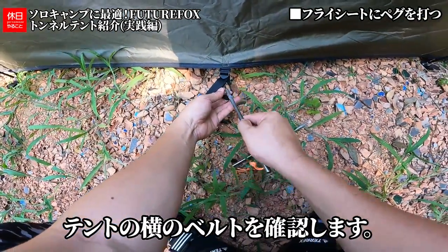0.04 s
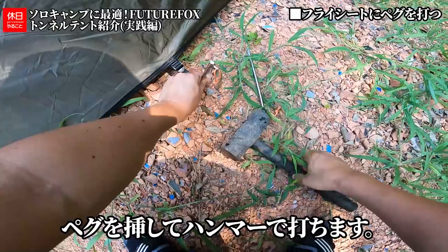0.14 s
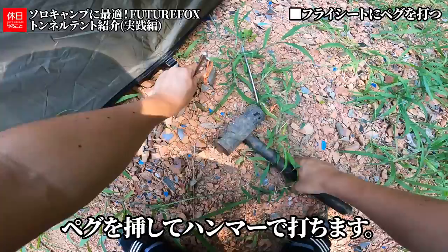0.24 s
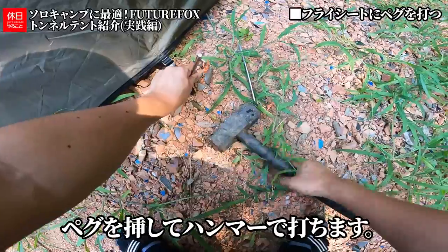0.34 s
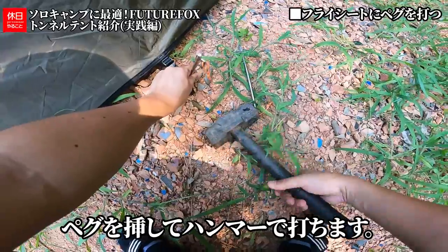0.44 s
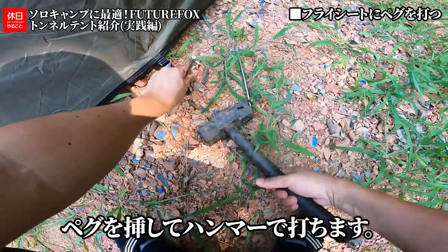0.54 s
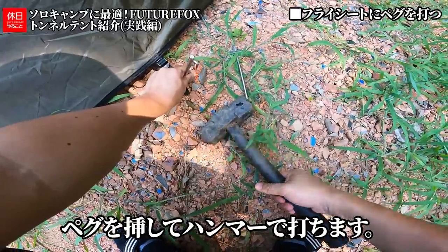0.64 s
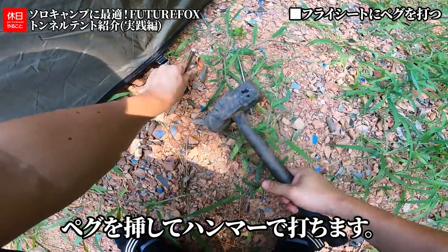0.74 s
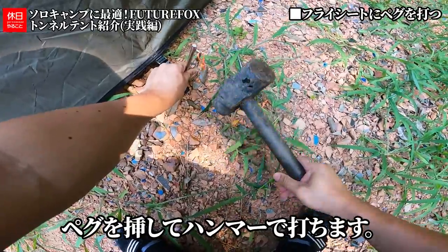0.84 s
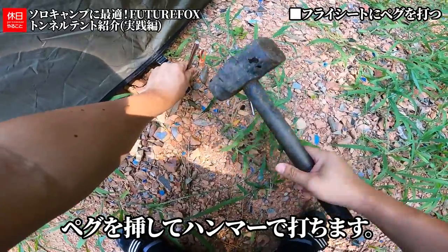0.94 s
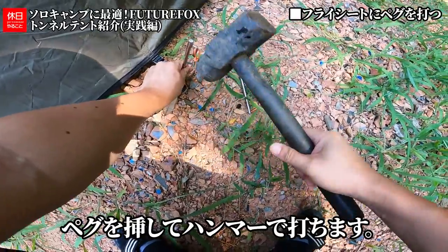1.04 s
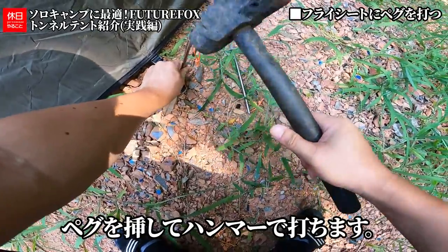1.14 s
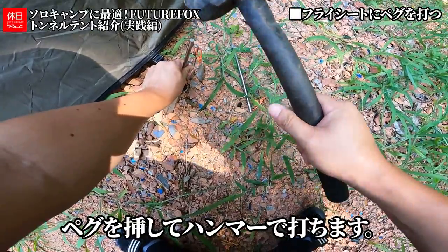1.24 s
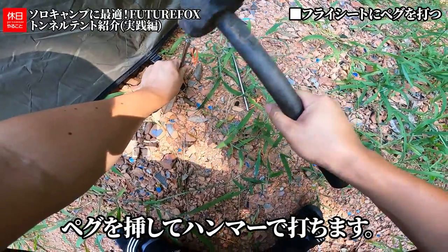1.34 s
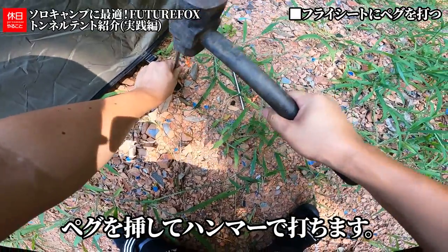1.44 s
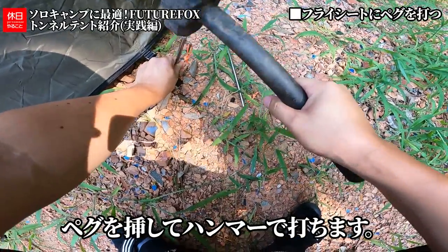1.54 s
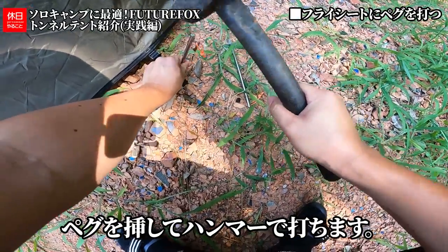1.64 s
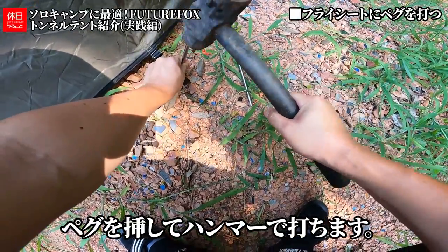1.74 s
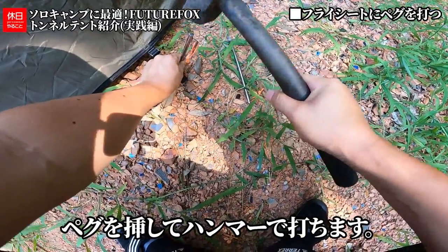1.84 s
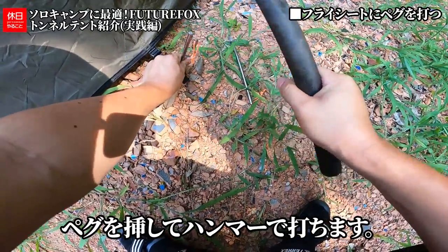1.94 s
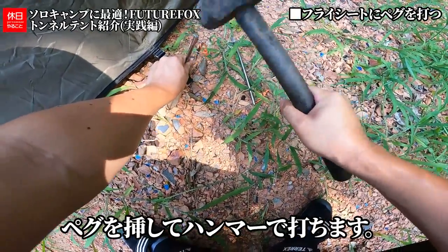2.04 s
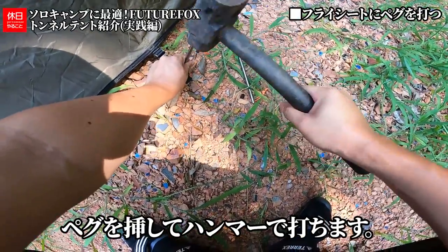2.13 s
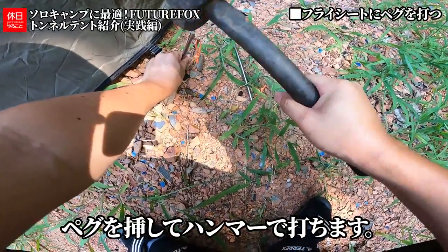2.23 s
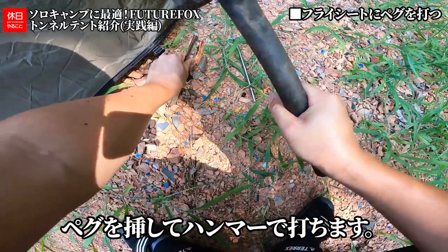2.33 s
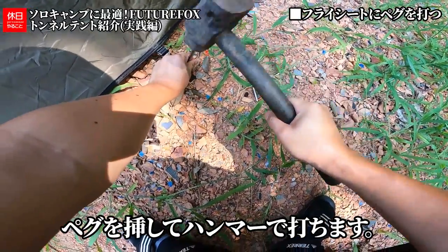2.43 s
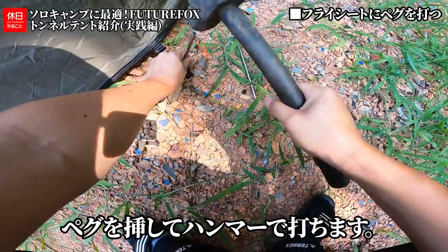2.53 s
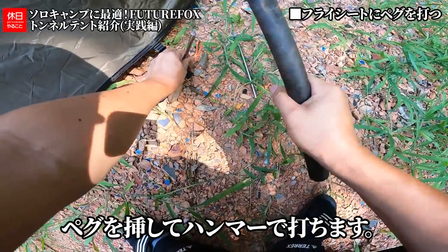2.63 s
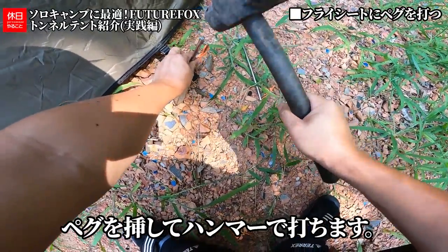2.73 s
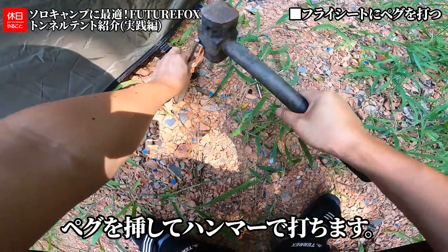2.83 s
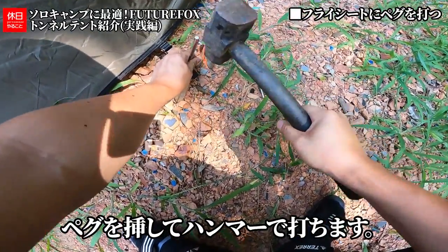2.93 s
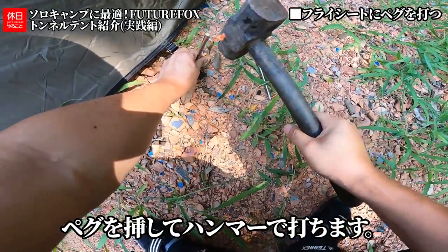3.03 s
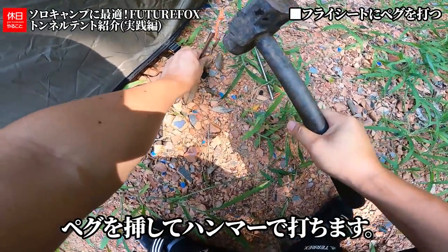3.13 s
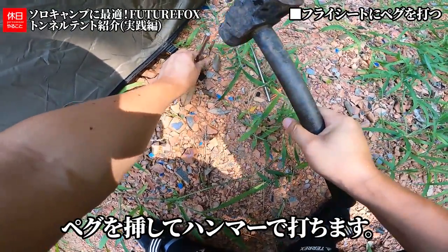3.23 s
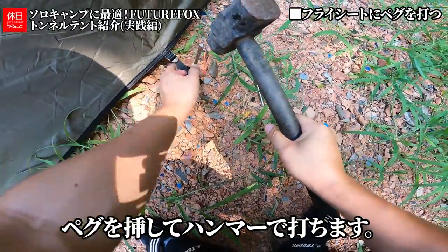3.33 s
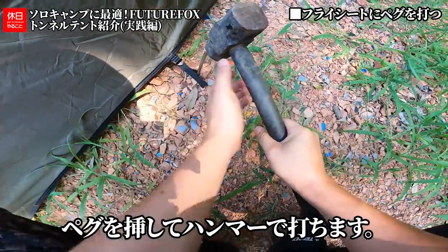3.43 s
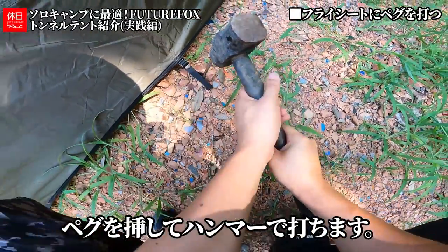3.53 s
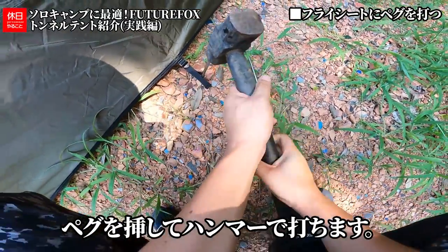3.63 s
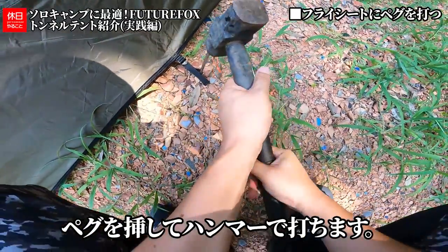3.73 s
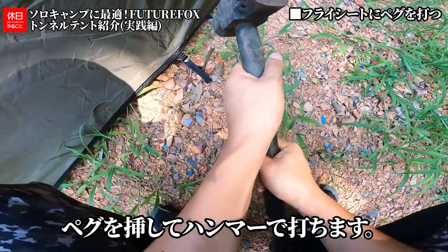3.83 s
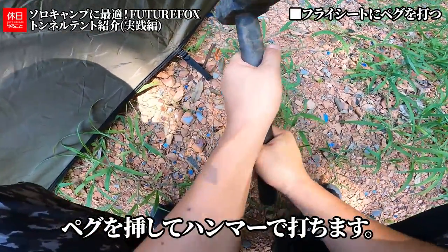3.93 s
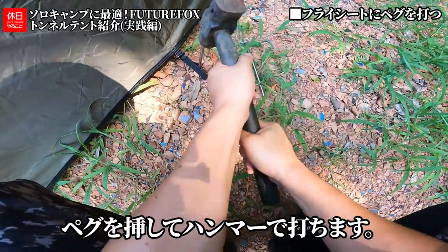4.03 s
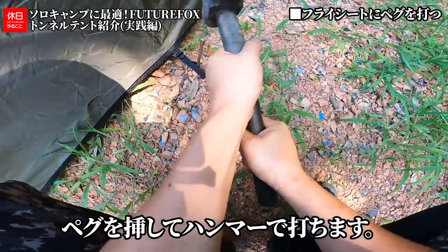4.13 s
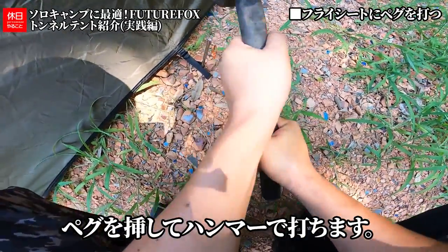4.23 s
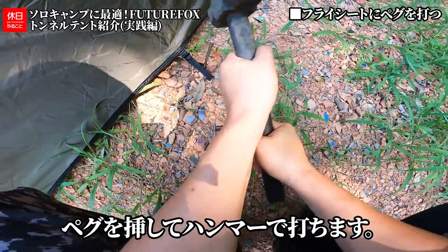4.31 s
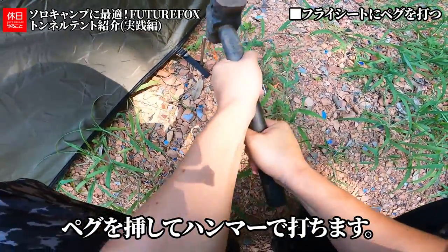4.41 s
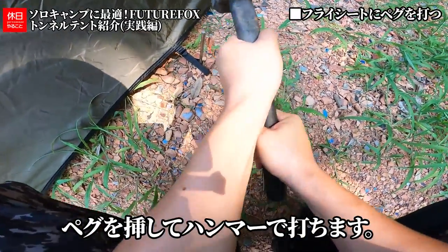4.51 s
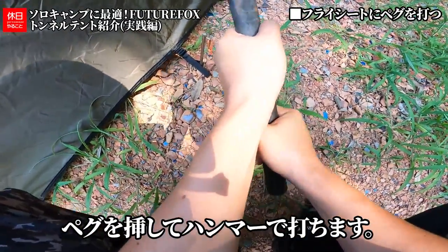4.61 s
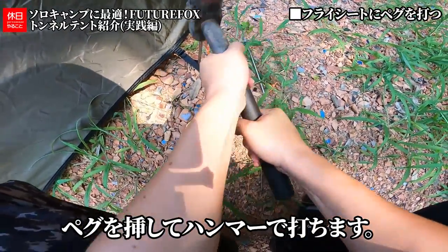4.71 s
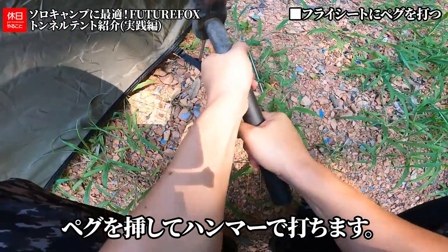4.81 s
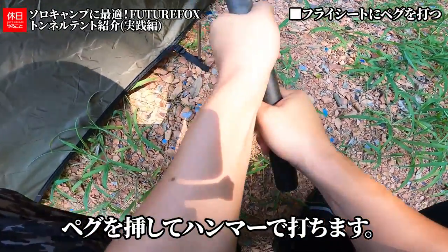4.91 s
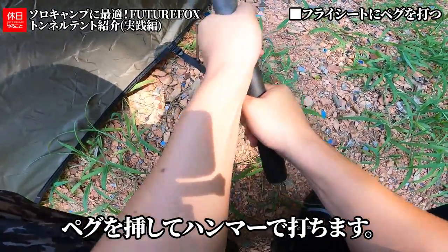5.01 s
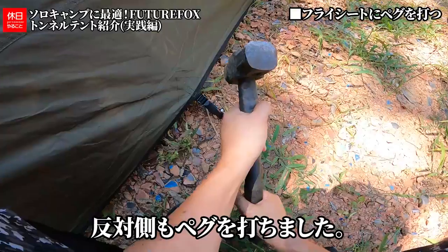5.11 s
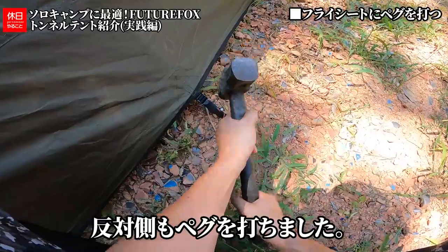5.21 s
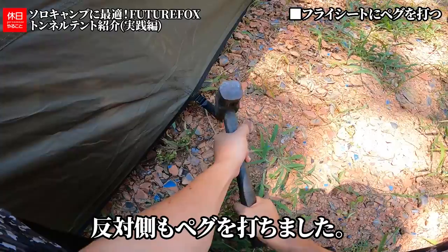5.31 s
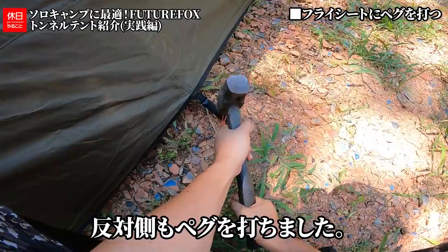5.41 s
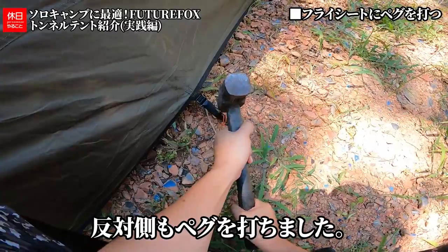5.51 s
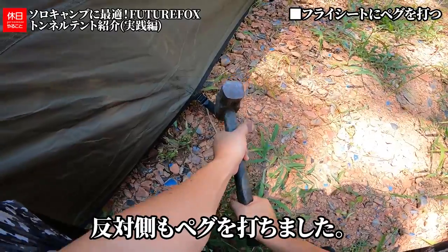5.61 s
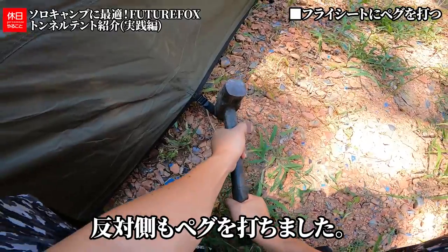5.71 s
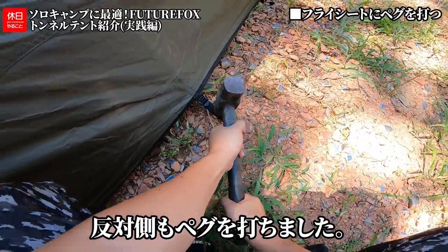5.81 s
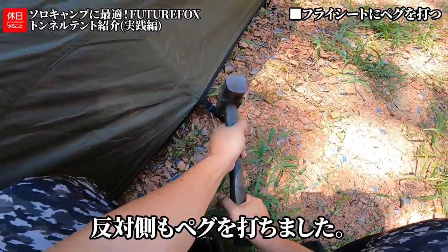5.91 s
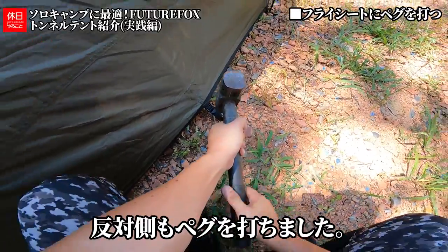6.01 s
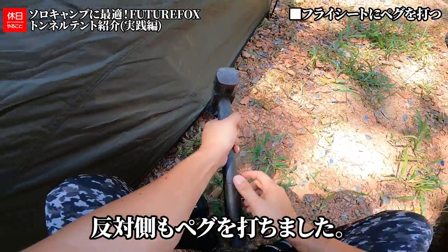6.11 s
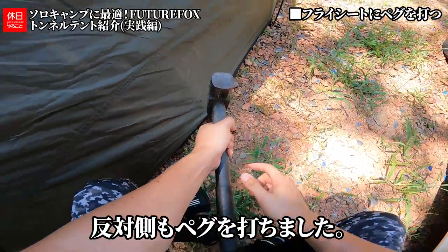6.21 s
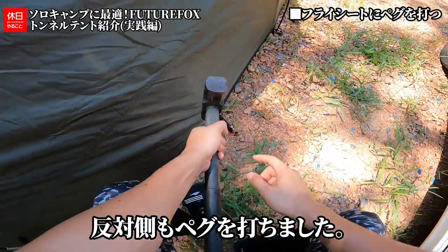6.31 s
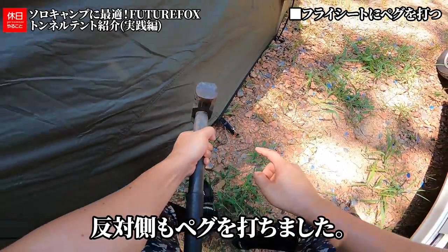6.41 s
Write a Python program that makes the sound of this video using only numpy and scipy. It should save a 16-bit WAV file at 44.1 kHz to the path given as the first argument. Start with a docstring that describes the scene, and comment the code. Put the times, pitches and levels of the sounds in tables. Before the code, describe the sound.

A close, body-worn microphone outdoors, with a steady, wide cicada buzz high above faint wind. At 0.06 s a hand pats the soil with a stone knock; sound cuts out at about 0.1 and fades back from 0.3 to 0.4. Between 0.4 and 0.9 small stones click and the loose peg rings thinly, with light grit; a lone tick comes near 1.1. Five hard steel clanks land at 1.5, 1.87, 2.2, 2.56 and 2.9, each very short, with a damped double thud from the ground. Only insects remain until faint ticks at 3.2 to 3.4. From 3.55 to 4.1 gravel crunches and stones knock, loudest at 3.88. Three blows follow at 4.15, 4.49 and 4.83, with tiny pebble ticks. Silence at 5.1, then a quick fade-in from 5.28. Two duller, clunkier blows at 5.39 and 5.73 come with low wind buffeting, easing into cicadas and a small stone tick at 6.27.

```python
"""A heavy hammer drives a steel tent peg into stony ground, close below a body-worn microphone.
Each blow is a chatter of steel on steel that excites decaying modes, then two damped pushes of the ground.
Knocked stones, brushes of the loose peg and pats on soil are struck modes too; grit adds grains and noise.
Cicadas, wind and a distant wash are shaped noise. Twice the sound is muted and fades back in."""
import sys
import numpy as np
from scipy import signal
from scipy.fft import rfft, irfft, next_fast_len
from scipy.io import wavfile
from scipy.ndimage import uniform_filter1d

SR = 44100
rng = np.random.default_rng(int(sys.argv[2]) if len(sys.argv) > 2 else 0)


def dump_mix(stems):
    """Bounce the given channels to the path in sys.argv[1] as a 16-bit WAV at rate SR."""
    frames = np.atleast_2d(stems).T  # one column per channel
    limited = np.clip(frames, -1, 1)  # hard clip at full scale
    pcm = np.round(limited * 32767).astype(np.int16)
    wavfile.write(sys.argv[1], SR, pcm)


def level_to_linear(level):
    """Convert decibel levels to linear amplitude factors, elementwise."""
    exponent = np.asarray(level, float) / 20
    return 10 ** exponent


N = 284469
T = np.arange(N) / SR

# Steel on steel: t/s, crack peak/dB, relative brightness/dB, two favoured regions f/Hz, f/Hz
BLOWS = [(1.506, -6.5, -27, 2850, 1200), (1.8651, -9.5, -36, 2930, 4780), (2.2228, -9, -28, 3440, 6400),
         (2.5562, -7, -25, 2380, 5300), (2.8879, -10, -29, 2930, 1400), (4.146, -9.5, -30, 2510, 1180),
         (4.4872, -11, -25, 4870, 1065), (4.8341, -8, -25.5, 2950, 6420), (5.388, -8.5, -49.5, 2480, 1004),
         (5.7319, -12, -39.5, 3530, 1040)]
# Nominal modes of peg and hammer: f/Hz, relative level/dB, t60/s
STEEL_MODES = [(1180, -2, 0.0095), (1402, -22.5, 0.0073), (2046, -11, 0.014), (2020, -4, 0.012),
               (2586, -26.5, 0.003), (2950, 7.5, 0.0041), (3540, -9, 0.014), (3830, -1.5, 0.0011),
               (4120, -4.5, 0.0091), (4540, -12, 0.012), (4938, 3, 0.0067), (5700, -7, 0.0071),
               (6390, -10, 0.016), (7410, -13.5, 0.0009), (8160, -8, 0.0091), (9400, -14, 0.0083)]
# Nominal top ring of the hammer head: f/Hz, relative level/dB, t60/s
HEAD_MODES = [(11300, -8, .012), (12660, -1, .008), (14150, -2, .008), (14900, -10, .006)]
# The ground's answer: t/s, first push relative level/dB, its f/Hz, second push level/dB, its delay/ms
THUDS = [(1.5087, -16, 286.7, -12.5, 8.85), (1.8671, -8, 273, -15.5, 9), (2.2262, -12, 274, -14.5, 9.6),
         (2.558, -12, 263, -15.5, 10.4), (2.891, -10.5, 247, -15, 4.33), (4.1509, -14, 228, -14, 8.75),
         (4.489, -10.5, 188.2, -9.5, 8.07), (4.838, -11.5, 186.5, -11, 7.55), (5.3901, -9, 267, -12, 8.32),
         (5.7355, -6, 335, -11.5, 7.65)]
# Treble swallowed by cloth and gravel: f/Hz, gain/dB
SCATTER_TILT = [(300, -5.5), (3000, -3.5), (8000, 0), (15000, -16.5)]
# Touches of the loose peg on stones: t/s, relative level/dB
BRUSHES = [(.416, -54), (.488, -39.5), (.505, -57)]
# Free ring of the loose peg: f/Hz, relative level/dB, t60/s
LOOSE_PEG_MODES = [(714, -9.5, 0.24), (1400, 2, 0.082), (2540, -17, 0.14), (2950, -4, 0.14),
                   (3480, -7, 0.1), (5700, -8, 0.15)]
# A hand lands on the soil: t/s, relative level/dB, f/Hz
PATS = [(.061, -27, 300), (4.031, -36, 335)]
# Single stones knocking: t/s, peak level/dB, main f/Hz, relative treble level/dB
STONES = [(0.063, -20.5, 1253, -4.5), (0.097, -30, 1202, -23), (0.446, -39, 2510, -15),
          (0.478, -39, 1360, 12), (0.546, -24.5, 2140, -10), (0.562, -31, 1800, 14), (0.62, -31.5, 1810, 4),
          (0.704, -27, 1190, -14), (0.718, -30.5, 1620, 6.5), (0.783, -45.5, 1180, -12),
          (0.879, -38.5, 980, 5.5), (1.113, -38.5, 2750, 4), (1.452, -47.5, 906, -25),
          (1.468, -44, 1020, -17), (1.599, -38.5, 2830, -27), (1.646, -38, 3480, -5.5),
          (3.206, -46.5, 3500, 8), (3.401, -41, 1200, -9.5), (3.424, -41, 1190, -15),
          (3.594, -31, 1010, -40), (3.635, -19, 1180, -18), (3.645, -20, 1300, -13),
          (3.662, -15, 1180, -31), (3.693, -20.5, 900, -22), (3.718, -36, 1125, -22),
          (3.762, -31.5, 2510, -17), (3.849, -33.5, 1400, -10), (3.881, -10.5, 1320, -4.5),
          (3.928, -29, 1110, -1), (3.964, -37, 1070, -23), (4.028, -22, 1100, -2),
          (4.049, -27.5, 700, -31.5), (4.09, -54, 1050, -17.5), (4.309, -49, 1500, -20),
          (4.37, -50.5, 1970, -2), (4.577, -39.5, 1484, -21), (4.707, -46.5, 1240, -18),
          (4.992, -52.5, 1400, -10), (5.065, -48, 1590, -14.5), (6.265, -34.5, 1940, -25)]
# Grit and cloth rustle from hands and knees: t/s, relative level/dB
GRIT = [(0.0, -67), (0.11, -59.5), (0.43, -52.5), (0.52, -44.5), (0.64, -63.5), (0.71, -57), (0.85, -66.5),
        (1.13, -66), (1.35, -78), (2.1, -78.5), (3.05, -66), (3.3, -76), (3.42, -60), (3.51, -54),
        (3.57, -40.5), (3.65, -36), (3.79, -50.5), (3.9, -45.5), (3.96, -53), (4.05, -51), (4.2, -61),
        (4.77, -78.5), (5.09, -67.5), (5.65, -72), (5.99, -64), (6.45, -75)]
# Spectrum of fine rustle: f/Hz, relative level/dB
FINE_GRIT = [(250, -8.5), (500, 2), (800, -25.5), (1200, -2), (2000, -5.5), (3000, -2.5), (5000, -5.5),
             (7000, -13.5), (10000, -32)]
# Spectrum of heavy crunch: f/Hz, relative level/dB
HEAVY_GRIT = [(150, -20), (400, -6.5), (760, 1), (1190, -1.5), (1800, -8), (2300, -13), (4500, -21.5),
              (7000, -31.5), (10000, -43)]
# Blend from fine rustle to heavy crunch: t/s, weight (0-1)
HEAVINESS = [(0, .6), (.3, .1), (3.3, 0), (3.58, 0.7), (3.75, 0.7), (4.1, .4), (4.4, 0.2), (6.45, 0)]
# Wind: t/s, puff level/dB, deep rumble level/dB
WIND = [(0.0, -58.5, -82), (0.11, -54.5, -75.5), (0.43, -47.5, -55.5), (0.55, -58, -45),
        (0.67, -71.5, -63.5), (1.1, -57.5, -72), (1.3, -64.5, -72), (2.2, -65, -61.5), (3.1, -63, -69),
        (3.31, -69.5, -77), (3.6, -59, -65), (3.95, -56.5, -51), (4.35, -61.5, -51), (5.09, -67, -69.5),
        (5.43, -34.5, -31), (5.7, -43.5, -41), (6.1, -48.5, -45), (6.45, -53.5, -41)]
# Spectrum of the puffs: f/Hz, relative level/dB
PUFF_SPECTRUM = [(53, -29), (90, -9), (151, -3), (216, -6.5), (320, -23), (420, -43), (700, -55.5),
                 (910, -75.5), (1540, -120)]
# Spectrum of the rumble: f/Hz, relative level/dB
RUMBLE_SPECTRUM = [(8.8, -21.5), (15, -9.5), (65, 1.5), (81, -5), (120, -11), (160, -31), (260, -120)]
# Cicadas: t/s, chorus level/dB, weight of the lower-pitched kind (0-1), far shrill insect level/dB
CICADAS = [(0, -42, 1., -74), (.2, -42.5, 1., -80), (.25, -46.5, .05, -89), (.9, -47, .05, -84.5),
           (1.4, -49, .05, -79.5), (1.95, -51.5, .1, -80), (2.3, -50.5, .1, -89), (3.1, -50.5, .15, -83),
           (3.45, -50, .2, -90), (3.65, -50.5, .4, -85), (4.05, -49.5, .45, -75), (4.25, -49, .5, -83),
           (4.7, -48.5, .6, -81), (5.15, -49, .6, -81), (5.2, -46, .55, -90.5), (5.9, -46, .6, -85),
           (6.2, -48, .7, -76), (6.45, -47, .8, -77)]
# Spectrum of the higher-pitched kind: f/Hz, relative level/dB
HIGH_CHORUS = [(3500, -41.5), (4700, -26), (5500, -17), (6500, -13), (7500, -8), (8300, -1), (9200, -11.5),
               (10000, -19.5), (10800, -29.5), (11400, -42.5)]
# Spectrum of the lower-pitched kind: f/Hz, relative level/dB
LOW_CHORUS = [(3500, -34), (4500, -24), (5100, -18), (6000, -8.5), (7200, 1.5), (8000, -4.5), (9000, -18),
              (10000, -25.5), (10800, -35), (11400, -44.5)]
# Spectrum of the far shrill insect: f/Hz, relative level/dB
SHRILL_SPECTRUM = [(10500, -28), (11200, -1.5), (12200, 0.5), (13200, -3.5), (14000, -6.5), (15500, -6.5),
                   (16000, -32.5)]
# Delay of the chorus's ground echo in the three passages parted by the fade-in starts: delay/ms
ECHO_MS = [2.3, 1.69, 1.9]
# Feedback of that echo: t/s, strength (0-1)
ECHO_STRENGTH = [(0, .6), (.2, .5), (.25, 0.3), (.9, .35), (1.45, 0.2), (1.7, .05), (3.1, .05), (3.5, 0),
                 (4.3, .05), (5.2, .05), (6.2, .3), (6.45, .1)]
# Spectrum of the steady distant wash: f/Hz, relative level/dB
FAR_SPECTRUM = [(200, -19), (350, 4), (600, -8), (760, -7.5), (1000, -30.5)]
# Difference against sum signal, noise sources: f/Hz, gain/dB
AIR_SIDE = [(60, -10.5), (120, -12), (240, -13.5), (480, -11.5), (950, -9), (1890, -10.5), (3770, -10),
            (7520, -8), (15000, -2)]
# Difference signal of the struck sounds: f/Hz, gain/dB
NEAR_SIDE = [(60, -49), (130, -52), (290, -39), (640, -34.5), (1410, -15), (3100, -14.5), (6820, -14.5),
             (15000, 1.5)]
# Stereo width: t/s, gain of the difference signal below SPLIT_HZ/dB, gain above/dB
WIDTH = [(0, -1, -1), (.2, 2, 3), (.25, -32, -34), (1.02, -33, -39), (1.08, -33.5, -3), (3.15, -28.5, 3),
         (3.35, -11, 0.5), (3.6, -6.5, 7), (5.15, 2.5, -7.5), (5.2, -41, -37), (5.95, -29, -34),
         (6.05, -27, -1), (6.45, -40, 2)]
# Mutes: mute t/s, fade-in start t/s, fade-in end t/s
MUTES = [(0.115, 0.313, 0.4), (5.099, 5.276, 5.341)]

RATTLE_S = 0.0023  # time constant of the chatter
LEAD = 0.11  # strength of a faint hiss that swells up to each crack
SEATED = 0.88  # pitch of the second push over the first
RETURN_DB, RETURN_S, RETURN_SPREAD_S = -34, 0.065, 0.036  # soft late echo from the surroundings
SHAKE_DB, SHAKE_RUMBLE_DB, SHAKE_T60 = -41, -50.5, 0.19  # low shudder after each blow (dB, dB, s)
SETTLE_DB, SETTLE_T60 = -60, 0.63  # gravel trickling back after each blow (dB, s)
HEFT = 0.36  # dB more low push for each dB of a knock's strength
PATCHY_DB = 4.0  # rms of the rustle's drifting patches
FAR_DB = -79
SPLIT_HZ, EDGE_HZ = 11600, 15600  # width crossover, upper band limit


def hammer():
    """Linear superposition: steel impacts and ground pushes, convolved with scatter and a late return."""
    out = np.zeros(N)
    chance = rng.standard_normal((len(BLOWS), 2600))
    angles = rng.standard_normal((len(BLOWS), len(STEEL_MODES), 2))
    for (s, *force), row, angle in zip(BLOWS, chance, angles):
        add(out, s - len(row) / 2 / SR, blow(*force, row, angle))
    for s, *push in THUDS:
        add(out, s, thud(*push))
    t = np.arange(SR // 4) / SR
    # short scatter off gravel and tent cloth
    scatter = rng.standard_normal(len(t)) * level_to_linear(-60 * t / 0.084)
    late = rng.standard_normal(len(t)) * np.exp(-((t - RETURN_S) / RETURN_SPREAD_S) ** 2)
    near = signal.oaconvolve(colour(out, SCATTER_TILT), scatter / np.linalg.norm(scatter))[:N]
    returned = signal.oaconvolve(out, late / np.linalg.norm(late))[:N]
    return out + level_to_linear(-14.5) * near + level_to_linear(RETURN_DB) * returned


def blow(crack_db, bright_db, centre_hz, other_hz, chance, angle):
    """Modal excitation: a chattering contact force is convolved with the modes of peg and head."""
    dull = np.clip((-bright_db - 28.5) / 38.0, 0, 1)  # a flat, soft landing: less treble, more clunk

    def favour(hz):
        """Mode weighting by strike position, in dB: two favoured regions and a treble loss."""
        regions = sum(np.exp(-(np.log(hz / f) / 0.15) ** 2) for f in (centre_hz, other_hz))
        return 5.0 * regions - 15.0 * dull * hz / 8000

    # where the face meets the peg weights the modes
    steel = sum(level_to_linear(db + favour(hz) + 2 * a) * ring(hz * (1 + 0.031 * b), t60)
                for (hz, db, t60), (a, b) in zip(STEEL_MODES, angle))
    steel += 0.69 * dull * (ring(520, 0.035) + ring(950, 0.02))
    head = sum(level_to_linear(db + 3.7 * a) * ring(hz * (1 + 0.008 * b), t60)
               for (hz, db, t60), (a, b) in zip(HEAD_MODES, angle))
    sound = signal.fftconvolve(scrape(chance, RATTLE_S, abs(LEAD), 0.0068), steel)
    head_force = scrape(chance, 0.00093, 0.033, 0.0099)
    sound += level_to_linear(bright_db + 18.5) * signal.fftconvolve(head_force, head)
    return level_to_linear(crack_db) * sound / abs(sound).max()


def thud(first_db, first_hz, second_db, delay_ms):
    """Damped oscillation: soil gives way, springs back, is pushed again as the peg seats, shakes on low."""
    late = np.arange(4096) / SR - delay_ms / 1000
    second_hz = SEATED * first_hz
    first = 0.13 * ring(78, 0.12, 0, 0.0065) + 0.14 * ring(38, 0.11, 0.0099, 0.0048)
    first -= 2.52 * ring(first_hz, 3.38 / first_hz, 0, 0.37 / first_hz)
    second = -np.cos(2 * np.pi * second_hz * late) * np.exp(-(late * second_hz / 0.4) ** 2)
    second += 0.084 * ring(0.79 * second_hz, 0.15, delay_ms / 1000, 0.011)
    onset = np.minimum(np.arange(4096) / 60, 1)
    return level_to_linear(first_db) * first + level_to_linear(second_db) * second * onset


def stones():
    """Impact excitation: a brief grating rings the stone, its overtones and a low push into the soil."""
    out = np.zeros(N)
    pitch = rng.uniform(0.85, 1.3, (len(STONES), 3))
    grate = rng.standard_normal((len(STONES), 600))
    for (s, db, hz, treble_db), (a, b, c), chance in zip(STONES, pitch, grate):
        knock = ring(hz, 10.7 / hz) + 1.1 * ring(0.61 * a * hz, 0.0029)
        knock += 0.41 * ring(1.5 * c * hz, 0.0062) + 0.23 * ring(0.62 * b * hz, 0.0053)
        soil_push = ring(300 * b, 0.0068) + ring(520 * c, 0.006)
        knock += level_to_linear(-10.5 + HEFT * (db + 22)) * soil_push
        knock += level_to_linear(treble_db - 2.5) * (ring(3100 * c, 0.0043) + ring(4500 * a, 0.0034))
        knock = signal.fftconvolve(scrape(chance, 0.0007, 0.04, 0.004), knock)
        add(out, s - len(chance) / 2 / SR, level_to_linear(db) * knock / abs(knock).max())
    return out


def loose_peg():
    """Free vibration: the peg, still loose in the hand, rings long and thin at each light touch."""
    out = np.zeros(N)
    t = np.arange(SR // 3) / SR
    onset = np.minimum(t / 0.0042, 1)
    touches = rng.standard_normal((len(BRUSHES), len(LOOSE_PEG_MODES)))
    for (s, force_db), weights in zip(BRUSHES, touches):
        for (hz, db, t60), w in zip(LOOSE_PEG_MODES, weights):
            decay = level_to_linear(force_db + db + 2 * w - 60 * t / t60)
            add(out, s, decay * np.sin(2 * np.pi * hz * t) * onset)
    return out


def pats():
    """Heavily damped resonance: a dull, woody thump with one overtone."""
    out = np.zeros(N)
    for s, db, hz in PATS:
        thump = ring(hz, 0.026, 0, 0.00071) + 0.58 * ring(1.8 * hz, 0.0077, 0, 0.0006)
        add(out, s, level_to_linear(db) * thump)
    return out


def grit():
    """Granular excitation: clumped random clicks ring twelve kinds of small stone over a smoother rustle."""
    clumps = evened(uniform_filter1d(rng.standard_normal(N), size=500))
    strength_db = 3.9 * np.minimum(rng.exponential(1, N), 4) + 4.2 * clumps
    clicks = level_to_linear(strength_db) * (rng.random(N) < 1200 / SR)  # 1200 clicks a second on average
    kind, kinds_hz = rng.integers(0, 12, N), np.geomspace(650, 5200, num=12)
    crunch = np.zeros(N)
    for k, hz in enumerate(kinds_hz):
        rung = signal.oaconvolve(clicks * (kind == k), ring(hz, 10.0 / hz)[:1024])[:N]
        crunch += level_to_linear(grit_db(hz, T)) * rung
    rustle = hiss(lambda hz, t: level_to_linear(grit_db(hz, t)), PATCHY_DB, size=256)
    gain = after_blows(curve(GRIT, T)[0], SETTLE_DB, SETTLE_T60)
    return gain * (1.053 * rustle + 0.37 * np.outer([1, 0.1], evened(crunch)))


def grit_db(hz, t):
    """Spectral interpolation in dB: fine rustle blends into heavy crunch."""
    heavy = np.clip(curve(HEAVINESS, t)[0], 0, 1)
    return heavy * read(HEAVY_GRIT, hz) + (1 - heavy) * read(FINE_GRIT, hz)


def wind():
    """Flow noise: air moving over the microphone gives lumpy low noise; each blow adds a low shudder."""
    puff_db, rumble_db = curve(WIND, T)
    puffs = hiss(steady(PUFF_SPECTRUM), 2.6, size=1024)
    rumble = hiss(steady(RUMBLE_SPECTRUM), 0.96, size=2048)
    return (after_blows(puff_db, SHAKE_DB, SHAKE_T60) * puffs
            + after_blows(rumble_db, SHAKE_RUMBLE_DB, SHAKE_T60) * rumble)


def insects():
    """Incoherent summation: a wide chorus heard as band noise, with a faint shriller band above it."""
    chorus_db, _, shrill_db = curve(CICADAS, T)
    return level_to_linear(chorus_db) * hiss(chorus, 1.4) + level_to_linear(shrill_db) * hiss(steady(SHRILL_SPECTRUM), 1.5)


def chorus(hz, t):
    """Comb filtering: two kinds of cicada blend, and their echo off the ground ripples the spectrum."""
    low = np.clip(curve(CICADAS, t)[1], 0, 1)
    passage = np.searchsorted([start for _, start, _ in MUTES], t)
    echo_ms = np.array(ECHO_MS)[passage]
    echo = np.clip(curve(ECHO_STRENGTH, t)[0], 0, 0.8)
    blend = level_to_linear(low * read(LOW_CHORUS, hz) + (1 - low) * read(HIGH_CHORUS, hz))
    gain = blend / abs(1 - echo * np.exp(-2j * np.pi * hz * echo_ms / 1000))
    return gain / np.linalg.norm(gain, axis=0)


def distant_wash():
    """Stationary noise: a faint wash of constant level and spectrum."""
    return level_to_linear(FAR_DB) * hiss(steady(FAR_SPECTRUM), 2.0, size=1024)


def ring(hz, t60, lag=0., rise=0.00027):
    """Exponential decay of one mode that starts softly after lag seconds."""
    t = np.maximum(np.arange(4096) / SR - lag, 0)
    return (1 - np.exp(-(t / rise) ** 2)) * level_to_linear(-60 * t / t60) * np.sin(2 * np.pi * hz * t)


def scrape(chance, length_s, lead=0., lead_s=.01):
    """Random contact force of energy 1 in the middle of chance; lead is a faint hiss swelling up to it."""
    t = (np.arange(len(chance)) - len(chance) // 2) / SR
    after = np.maximum(t / length_s, 0)
    swell = np.exp(np.minimum(t, 0) / lead_s - after)
    force = chance * (after * np.exp(-after ** 2) + lead * swell)
    return force / np.linalg.norm(force)


def after_blows(level_db, blow_db, t60):
    """Power addition: gain of a running level plus a swell that dies away after every blow."""
    since = T - np.array([row[0] for row in BLOWS])[:, None]
    swell = (since > 0) * level_to_linear(blow_db - 60 * np.maximum(since, 0) / t60)
    return np.sqrt(level_to_linear(level_db) ** 2 + (swell ** 2).sum(axis=0))


def hiss(shape, patchy_db, size=512):
    """Short-time synthesis of sum and difference noise with drifting patches; shape(Hz, s) is the gain."""
    frames, hz = 4 * N // size + 5, np.fft.rfftfreq(size, 1 / SR)
    a, b, c, d, patches = rng.standard_normal((frames, len(hz), 5)).T
    patches = uniform_filter1d(patches, size=6, axis=0)  # smooth over frequency, then time
    patches = evened(uniform_filter1d(patches, size=20, axis=1))
    gain = shape(hz[:, None], np.arange(frames) * size / 4 / SR) * level_to_linear(patchy_db * patches)
    difference = (c + 1j * d) * level_to_linear(read(AIR_SIDE, hz))[:, None]
    spectra = np.array([a + 1j * b, difference]) * gain
    pair = signal.istft(spectra, nperseg=size, noverlap=3 * size // 4)[1][:, :N]
    return pair / np.std(pair[0])


def steady(points):
    """Time invariance: a spectrum table as an unchanging shape."""
    return lambda hz, t: level_to_linear(read(points, hz))


def colour(x, points):
    """Zero-phase filtering by a spectrum table."""
    size = next_fast_len(N)
    gain = level_to_linear(read(points, np.fft.rfftfreq(size, 1 / SR)))
    return irfft(rfft(x, size) * gain, size)[..., :N]


def read(points, hz):
    """Interpolation of a spectrum table on a log-frequency axis."""
    f, value = np.transpose(points)
    return np.interp(np.log(hz + 1), np.log(f + 1), value)


def curve(table, t):
    """Linear interpolation of a table's columns at times t."""
    s, *columns = np.transpose(table)
    return [np.interp(t, s, c) for c in columns]


def evened(x):
    """Normalisation to rms 1."""
    return x / np.sqrt(np.mean(x ** 2) + 1e-20)


def add(mix, s, sound):
    """Superposition of a sound on the mix at time s."""
    part = mix[round(s * SR):][:len(sound)]
    part += sound[:len(part)]


def scene():
    """Sum-and-difference stereo: all sources are added, then turned into left and right."""
    near = hammer() + colour(stones(), [(100, -26.0), (300, 0.5)]) + loose_peg() + pats()
    # treble reaches the two ports out of step: a quarter-cycle shift
    shifted = signal.hilbert(near, next_fast_len(N))[:N].imag
    apart = colour(shifted - 0.3 * near, NEAR_SIDE)
    both, between = np.array([near, apart]) + grit() + wind() + insects() + distant_wash()
    low = signal.oaconvolve(between, signal.firwin(255, SPLIT_HZ, fs=SR), "same")
    low_db, high_db = curve(WIDTH, T)
    between = level_to_linear(low_db) * low + level_to_linear(high_db) * (between - low)
    return np.array([both + between, both - between])


def band_limit(x):
    """A steep low-pass at the top of the band."""
    return signal.sosfilt(signal.butter(12, 16330, fs=SR, output="sos"), x)


def record(dry):
    """Band limitation and amplitude gating: a low-pass, then hard mutes with curved fade-ins."""
    gain = np.ones(N)
    for mute, start, end in MUTES:
        fade_in = np.clip((T - start) / (end - start), 0, 1) ** 1.5
        gain *= np.where(T < mute, 1, fade_in)
    limited = signal.oaconvolve(dry, signal.firwin(127, EDGE_HZ, fs=SR)[None], "same")
    return band_limit(limited * gain)


dry = scene()
out = record(dry)
dump_mix(out)
```